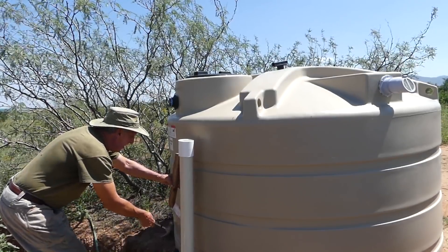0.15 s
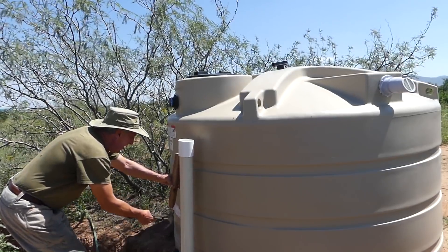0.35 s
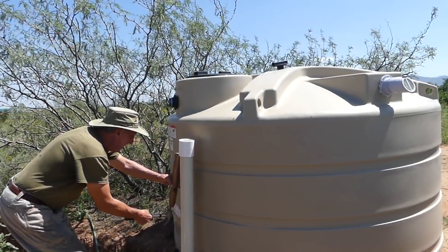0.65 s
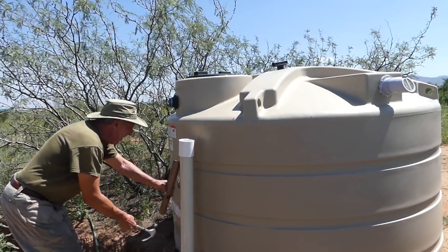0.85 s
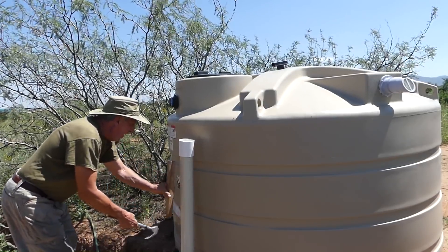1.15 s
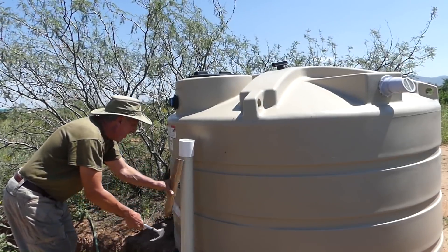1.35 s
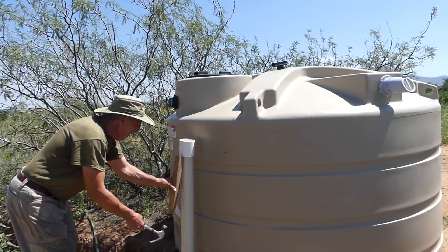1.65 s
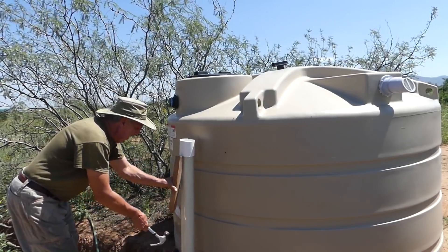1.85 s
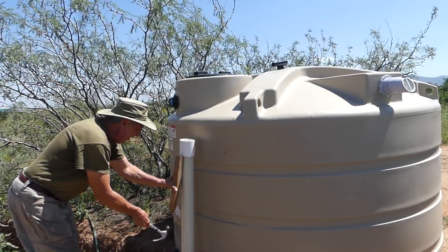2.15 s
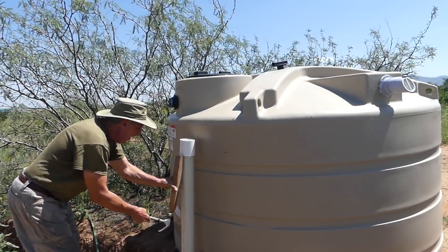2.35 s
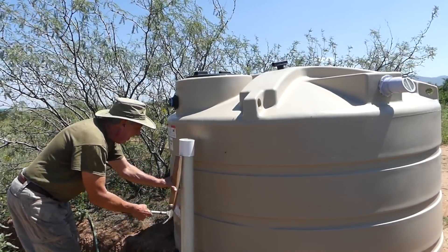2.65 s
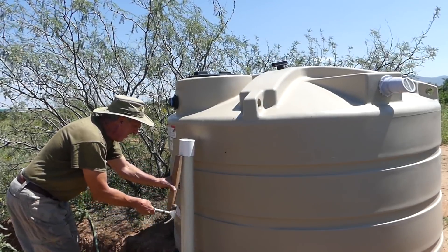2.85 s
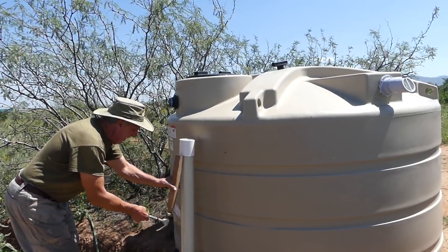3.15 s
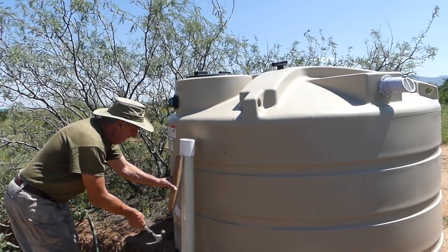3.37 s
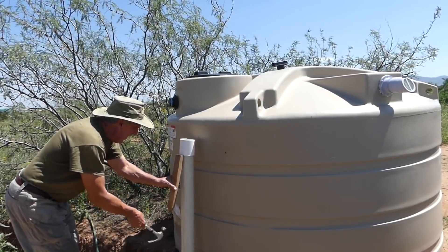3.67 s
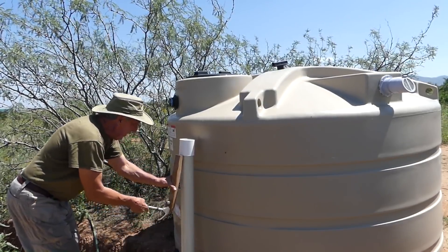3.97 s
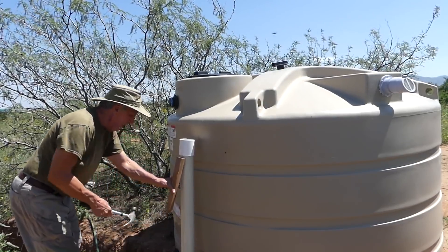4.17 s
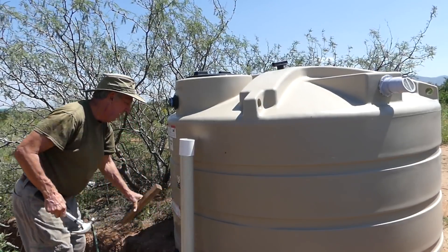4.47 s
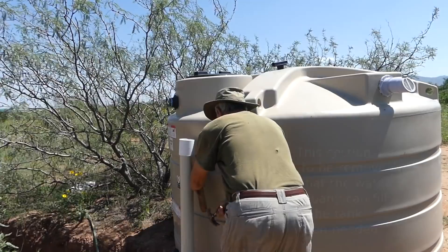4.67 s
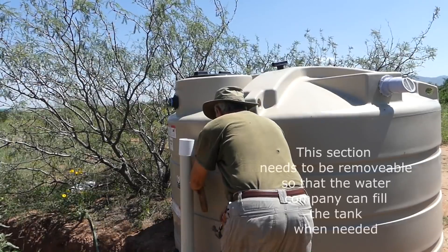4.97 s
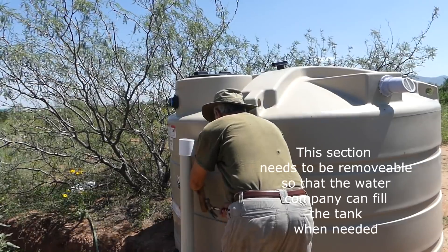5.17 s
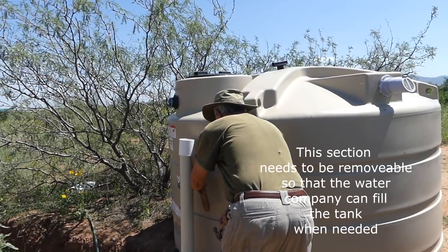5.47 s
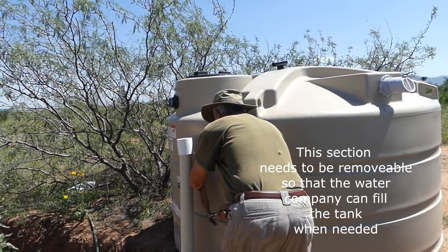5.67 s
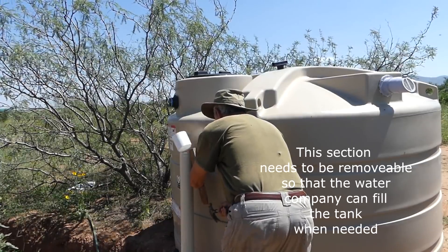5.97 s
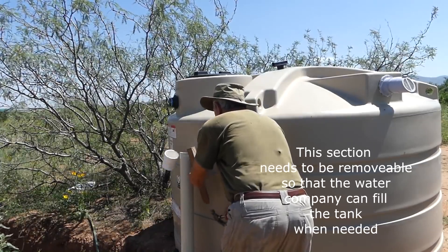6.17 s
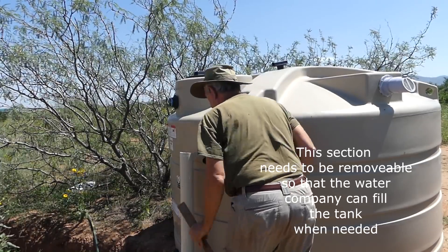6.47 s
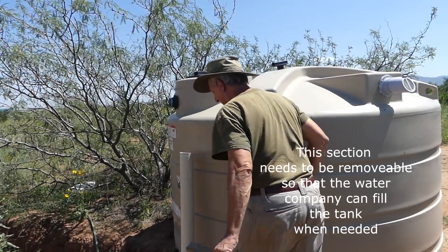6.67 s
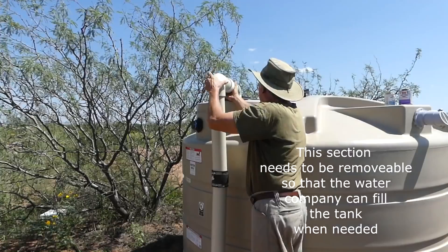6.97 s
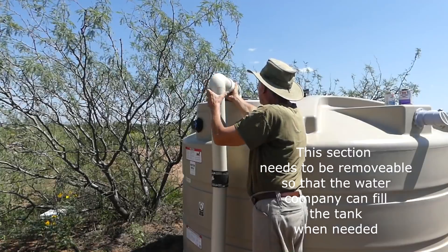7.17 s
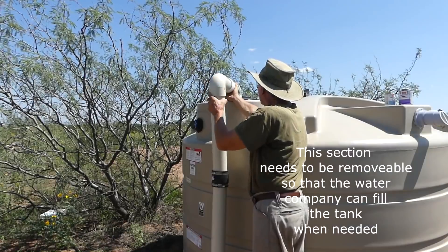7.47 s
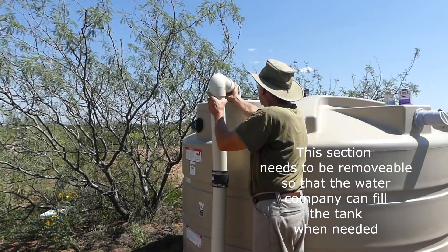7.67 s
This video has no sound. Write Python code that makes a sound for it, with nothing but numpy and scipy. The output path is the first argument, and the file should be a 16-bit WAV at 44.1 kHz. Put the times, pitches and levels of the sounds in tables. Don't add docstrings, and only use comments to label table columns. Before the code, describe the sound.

Dry, bright hammer knocks with a short hollow pipe and tank ring, each followed by a very faint thin echo. Pairs of blows are separated by soft positioning taps. A board lifts with a low woody clunk amid rustling and scuffs, two more blows follow, and the cap crackles through brush and hits grit hard. Windy open yard, live microphone on the left only, steady hiss on both sides.

```python
import sys
import numpy as np
from scipy import signal
from scipy.fft import rfft, irfft, next_fast_len
from scipy.io import wavfile
from scipy.ndimage import uniform_filter1d, minimum_filter1d, map_coordinates

SR = 44100
rng = np.random.default_rng(int(sys.argv[2]) if len(sys.argv) > 2 else 0)


def gain_from_decibels(decibels):
    exponent = np.asarray(decibels, float) / 20
    return 10 ** exponent


def to_wav(s):
    ch = np.atleast_2d(s).T
    pcm = np.round(np.clip(ch, -1, 1) * 32767)
    wavfile.write(sys.argv[1], SR, pcm.astype(np.int16))


N = 345072
TIME = np.arange(N) / SR

# time in seconds, level in dB.
WIND_STRENGTH = [(0, -36.5), (.45, -42.5), (1.0, -43), (1.12, -38), (1.75, -41), (2.25, -56), (2.45, -42),
                 (2.7, -46.5), (4.14, -42), (4.5, -50), (4.99, -38), (5.2, -47), (5.75, -58), (6.35, -53),
                 (6.5, -39), (6.95, -43.5), (7.1, -57.5), (7.83, -55)]
# middle in seconds, length in seconds, flutter level in dB.
EDDIES = [(0.026, 0.066, -48), (0.26, 0.34, -51), (.56, .15, -43), (0.852, 0.19, -44), (1.23, 0.23, -51),
          (1.392, 0.18, -46.5), (1.65, 0.37, -48.5), (2.42, 0.1, -45.5), (2.899, 0.18, -44.5),
          (3.37, 0.3, -52), (3.77, 0.2, -50.5), (3.958, 0.26, -45.5), (4.097, 0.083, -48),
          (4.774, 0.17, -45.5), (4.924, 0.2, -48.5), (5.456, 0.092, -50), (6.48, .12, -53),
          (6.752, 0.18, -47), (6.907, 0.2, -46.5)]
# start in seconds, peak in dB, pitch in Hz.
GUST_SLAPS = [
    (0.471, -34.5, 149),
]
# start in seconds, tank, hammer head and bright ring in dB, struck spot in Hz.
BLOWS = [
    (0.2614, -19, -14, -20.5, 1310),
    (0.5708, -25.5, -14.5, -16, 1646),
    (1.9865, -21.5, -23.5, -20.5, 1380),
    (2.3284, -24, -22.5, -20.5, 1340),
    (3.1748, -29.5, -18.5, -22, 1440),
    (3.493, -24.5, -21.5, -17.5, 1290),
    (5.5969, -20.5, -16, -18.5, 1000),
    (5.954, -20.5, -18.5, -14.5, 1496),
]
# start in seconds, pipe, hammer head and bright ring in dB,
# struck spot in Hz.
TAPS = [(1.278, -37.5, -56, -53, 1090), (1.417, -46.5, -64, -64, 1190), (1.517, -43.5, -62, -63, 696),
        (2.6646, -36, -45.5, -37.5, 1100), (3.8167, -44, -38, -42.5, 1100), (3.9216, -35, -56, -57, 950),
        (4.362, -54, -73, -63, 1180), (4.4552, -42.5, -38.5, -36, 1280), (4.4635, -42.5, -61, -50.5, 1290),
        (4.49, -58, -52, -43, 891), (4.7204, -39.5, -38.5, -48, 720)]
# start in seconds, length in seconds, rustle in dB, scuff in dB.
DRAGS = [
    (4.061, 0.52, -65, -57),
    (4.442, .065, -49, -47.5),
    (4.517, 0.057, -58.5, -53),
    (4.578, 0.05, -53.5, -62),
    (4.631, 0.043, -50, -58),
    (5.015, 0.21, -80, -59),
    (6.457, 0.068, -55, -58),
    (6.496, .13, -55, -51),
    (6.768, 0.056, -60.5, -57),
]
# start in seconds, peak in dB.
TWIG_SNAPS = [(4.431, -42), (4.506, -47), (4.5324, -48), (4.595, -55), (5.3941, -49), (6.4613, -32.5),
              (6.4734, -48), (6.4804, -43), (6.4904, -51), (6.5296, -45), (6.6174, -53), (6.6544, -53),
              (6.6634, -44), (6.7351, -49), (6.8069, -46)]
# start in seconds, peak in dB.
BOARD_LIFTS = [
    (4.429, -31),
    (4.49, -37.5),
]
# start in seconds, peak in dB.
CAP_LANDINGS = [
    (6.5954, -16.5),
    (6.6028, -4),
]

# pitch in Hz, level in dB, time to fall 60 dB in seconds.
TANK_MODES = [(372, -13, 0.06), (519.3, -3, 0.055), (551, -11.5, 0.08), (676.5, -11.5, 0.063)]
PIPE_MODES = [(730, -5, .055), (840, -4, .045), (1060, -4, .045), (1210, 0, .035), (1420, -2, .025),
              (1580, -4, .025), (1800, -5, .02), (2100, -7, .015)]
HEAD_MODES = [(2590, -6, .04), (2770, -5, .04), (2660, -14, .075), (2730, -26, .1), (2860, 0, .016),
              (2450, -3, .012), (3150, -4, .012)]
BRIGHT_MODES = [(4160, -4.5, 0.013), (4590, -0.5, 0.015), (5270, 0, 0.013), (5850, -4, 0.03),
                (6534, -4.5, 0.019), (7300, 1, 0.0077)]
CAP_MODES = [(212, -10.5, 0.12), (246, 2, 0.028), (346, 3, 0.027), (513, -15, 0.057), (801, 5.5, 0.035),
             (1007, 7.5, 0.016), (1725, -9, 0.024), (2160, 1.5, 0.014), (4940, -9.5, 0.036)]
BOARD_MODES = [(343.6, -3, 0.15), (650, -10.5, 0.044), (1250, -18, .04)]

# frequency in Hz, level in dB per Hz.
RUMBLE_COLOUR = [(10, 2.5), (20, 4.5), (40, -2.5), (65, -12.5), (110, -66), (300, -82)]
FLUTTER_COLOUR = [(30, -5.5), (70, 2.5), (110, -1.5), (170, -10), (260, -19), (450, -46), (1500, -92.5)]
BREEZE_COLOUR = [(60, -23.5), (150, -8.5), (300, -7.5), (600, -11.5), (1200, -16), (2300, -21), (8000, -28),
                 (11000, -30.5), (17000, -90.5)]
KNOCK_COLOUR = [(120, -42), (200, -15.5), (1350, -5), (2290, -10), (4680, -20.5), (5840, -20),
                (13800, -35.5), (16000, -51)]
BRUSH_COLOUR = [(410, -29.5), (700, -13), (2460, -4.5), (3970, -10), (5190, -5), (10000, -28), (13000, -17),
                (22000, -120)]
SCUFF_COLOUR = [(150, -21), (350, -5.5), (700, -1.5), (1200, -7), (2200, -19), (5000, -58)]
GRIT_COLOUR = [(500, -11), (2100, -2.5), (3000, -17), (3900, 2.5), (5500, -5.5), (7000, -11), (9500, -25.5),
               (14000, -36)]
HISS_COLOUR = [(30, -7.5), (900, -7.5), (2300, -14.5), (5000, -8.5), (9000, -6), (14000, 1.5), (15500, 2.5)]
# frequency in Hz, gain in dB.
ECHO_COLOUR = [(400, -8), (2000, -8.5), (4000, -3.5), (5900, 6), (9000, -14)]
# frequency in Hz, share from 0 to 1.
SHARED_HISS = [(3000, .03), (7000, 0.6), (11000, 0.73), (15000, 0.71)]
# frequency in Hz, time to fall 60 dB in seconds.
SCATTER_DECAY = [(200, 0.13), (530, 0.11), (1400, 0.089), (2700, 0.071), (6000, 0.094), (9700, 0.023)]


def unit(x):
    return x / np.sqrt(np.mean(x ** 2) + 1e-20)


def along(points, hz):
    f, value = np.transpose(points)
    return np.interp(np.log(hz + 1), np.log(f + 1), value)


def wobble(rate):
    knots = rng.standard_normal(int(N * rate / SR) + 4)
    return map_coordinates(knots, [np.arange(N) * rate / SR])


def filtered(x, response):
    size = next_fast_len(x.shape[-1] + 8192)
    spectrum = rfft(x, size) * response(np.fft.rfftfreq(size, 1 / SR))
    return irfft(spectrum, size)[..., :x.shape[-1]]


def coloured(x, colour):
    return filtered(x, lambda hz: gain_from_decibels(along(colour, hz)))


def noise(colour):
    return unit(coloured(rng.standard_normal(N), colour))


def add(track, s, x):
    track[round(s * SR):][:len(x)] += x


def ring(modes, spread_db, attack):
    t = np.arange(SR // 5) / SR
    hz, db, t60 = np.transpose(modes)[:, :, None]
    strength, tuning, phase = rng.standard_normal((3, len(modes), 1))
    level = gain_from_decibels(db + spread_db * strength - 60 * t / t60)
    tones = level * np.sin(2 * np.pi * hz * (1 + 0.0099 * tuning) * t + 1.11 * phase)
    x = tones.sum(0) * (1 - np.exp(-t / attack))
    return x / np.abs(x).max()


def burst(decays):
    size = SR // 5
    raw = coloured(rng.standard_normal(size), KNOCK_COLOUR)
    hz, t, cells = signal.stft(raw, SR, nperseg=128)
    fade = gain_from_decibels(-60 * t / along(decays, hz)[:, None])
    x = signal.istft(cells * fade, SR, nperseg=128)[1][:size]
    return x / np.abs(x).max()


def wind():
    s, db = np.transpose(WIND_STRENGTH)
    strength_db = np.interp(TIME, s, db)
    swing_db = strength_db - strength_db.mean()
    buffet = gain_from_decibels(strength_db + 8.5) * unit(gain_from_decibels(2.4 * wobble(4.7)) * noise(RUMBLE_COLOUR))

    middle, length, eddy_db = np.transpose(EDDIES)[:, :, None]
    eddies = (gain_from_decibels(eddy_db) * np.exp(-2 * ((TIME - middle) / (length / 2)) ** 2)).sum(0)
    flutter_level = gain_from_decibels(4.5) * (gain_from_decibels(-54.5 + 0.47 * swing_db) + eddies)
    flutter = flutter_level * unit(gain_from_decibels(1.8 * wobble(30)) * noise(FLUTTER_COLOUR))

    breeze = gain_from_decibels(-64 + 0.089 * swing_db + 10 + 0.15 * wobble(5.5)) * noise(BREEZE_COLOUR)

    slap = np.zeros(N + SR)
    for s, db, hz in GUST_SLAPS:
        modes = [(hz, 0, .15), (1.3 * hz, -2, .15), (2.2 * hz, -6, .12)]
        add(slap, s, gain_from_decibels(db + 10) * ring(modes, spread_db=-0.5, attack=0.0032))
    return buffet + flutter + breeze + slap[:N]


def thuds():
    out = np.zeros(N + SR)
    hz, t60 = 177.7, 0.1
    for s, *_ in BLOWS:
        modes = [(hz, 0, t60), (1.67 * hz, 3, t60)]
        add(out, s, gain_from_decibels(-33.5) * ring(modes, spread_db=6.5, attack=0.005))
    return out[:N]


def knocks(rows, clap_db, crack_db, scatter_db, onset_s):
    out = np.zeros(N + SR)
    thin = lambda hz: np.clip(hz / 4500, 0, 1) ** 2
    for s, pipe_db, tank_db, head_db, bright_db, spot_hz in rows:
        pipe = [(hz, db - 6 * np.log2(hz / spot_hz) ** 2, t60) for hz, db, t60 in PIPE_MODES]
        pipe_ring = .55 * ring(pipe, spread_db=2.0, attack=0.0036)
        clap = ring([(spot_hz, 0, .008), (1.32 * spot_hz, -5, .006)], spread_db=0, attack=0.00031)
        scatter = gain_from_decibels(scatter_db) * burst([(300, 0.11), (3000, 0.033), (9000, 0.022)])
        body = gain_from_decibels(pipe_db) * (pipe_ring + gain_from_decibels(clap_db) * clap + scatter)

        wall = gain_from_decibels(tank_db) * ring(TANK_MODES, spread_db=4.5, attack=0.0042)
        head = gain_from_decibels(head_db) * ring(HEAD_MODES, spread_db=2.0, attack=0.00073)

        crack = gain_from_decibels(crack_db) * filtered(burst([(1000, 0.0044), (10000, 0.011)]), thin)
        sheen = filtered(burst(SCATTER_DECAY), thin)
        bright = gain_from_decibels(bright_db) * (ring(BRIGHT_MODES, spread_db=1.0, attack=0.0015) + crack + sheen)

        onset = 1 - np.exp(-np.arange(len(body)) / SR / onset_s)
        knock = gain_from_decibels(7.0) * (body + wall + head + bright) * onset
        add(out, s + 0.001103, knock)
        add(out, s + .0795, far_bank(knock))
    return out[:N]


def far_bank(x):
    t = np.arange(SR // 20) / SR
    face = rng.standard_normal(len(t)) * gain_from_decibels(-60 * t / 0.015)
    smear = face.copy()
    for lag_s, db in [(.0105, -5), (.017, -4)]:
        smear += gain_from_decibels(db) * np.pad(face, (round(lag_s * SR), 0))[:len(t)]
    echo = signal.fftconvolve(x, smear / np.linalg.norm(smear))
    return gain_from_decibels(-31.5) * coloured(echo, ECHO_COLOUR)


def brush():
    start, length, rustle_db, scuff_db = np.transpose(DRAGS)[:, :, None]
    progress = (TIME - start) / length
    shape = np.clip(np.minimum(progress / 0.14, 1 + (1 - progress) / 0.48), 0, 1) ** 2
    grains = gain_from_decibels(3 * wobble(500) + 2.4 * wobble(90))
    clumps = gain_from_decibels(3 * wobble(120) + 1.6 * wobble(30))
    rustle = (gain_from_decibels(rustle_db + 2) * shape).max(0) * unit(grains * noise(BRUSH_COLOUR))
    scuff = (gain_from_decibels(scuff_db + 3.5) * shape).max(0) * unit(clumps * noise(SCUFF_COLOUR))

    snaps = np.zeros(N + SR)
    t = np.arange(400) / SR
    for s, db in TWIG_SNAPS:
        add(snaps, s, gain_from_decibels(db + 14.0 - 60 * t / 0.0066) * rng.standard_normal(len(t)))
    return rustle + scuff + coloured(snaps[:N], BRUSH_COLOUR)


def cap_and_board():
    out = np.zeros(N + SR)
    for s, db in BOARD_LIFTS:
        add(out, s, gain_from_decibels(db + 4.5) * ring(BOARD_MODES, spread_db=3, attack=0.0014))

    t = np.arange(800) / SR
    for s, db in CAP_LANDINGS:
        crunch = coloured(rng.standard_normal(len(t)), GRIT_COLOUR) * gain_from_decibels(-60 * t / 0.012)
        shell = ring(CAP_MODES, spread_db=1, attack=.0008)
        scatter = gain_from_decibels(-13) * burst([(300, 0.14), (2000, 0.044), (9000, .03)])
        add(out, s, gain_from_decibels(db + 2) * (shell + scatter))
        add(out, s, gain_from_decibels(db + 7.5) * crunch)
    return out[:N]


def scene():
    blow_rows = [(s, -15.5, *rest) for s, *rest in BLOWS]
    tap_rows = [(s, db, db - 3.5, *rest) for s, db, *rest in TAPS]
    blows = knocks(blow_rows, clap_db=5, crack_db=7.5, scatter_db=1.5, onset_s=.00005)
    taps = knocks(tap_rows, clap_db=1.5, crack_db=-14, scatter_db=-6, onset_s=0.001)
    left = wind() + blows + thuds() + taps + brush() + cap_and_board()
    return np.array([left, 0 * left])


def hiss():
    share = lambda hz: np.clip(along(SHARED_HISS, hz), 0, 1)
    common = filtered(noise(HISS_COLOUR), lambda hz: np.sqrt(share(hz)))
    separate = np.array([noise(HISS_COLOUR), noise(HISS_COLOUR)])
    own = filtered(separate, lambda hz: np.sqrt(1 - share(hz)))
    return gain_from_decibels(-56.5) * (common + own)


def band_limit(x):
    return signal.sosfilt(signal.butter(12, 16810, fs=SR, output="sos"), x)


def record(dry):
    x = dry + hiss()
    need = np.minimum(1, .92 / (np.abs(x[0]) + 1e-9))
    x = x * uniform_filter1d(minimum_filter1d(need, size=400), size=200)
    x = x * gain_from_decibels(-6 * np.exp(-((TIME - 4.685) / 0.0043) ** 2))
    notch_hz, notch_width_hz, top_hz = 5925, 130, 15700
    notch = lambda hz: (hz - notch_hz) / (hz - notch_hz - .5j * notch_width_hz)
    mix = filtered(x, lambda hz: notch(hz) * np.where(hz < top_hz, 1, gain_from_decibels(-64)))
    return band_limit(mix)


dry = scene()
out = record(dry)
to_wav(out)
```